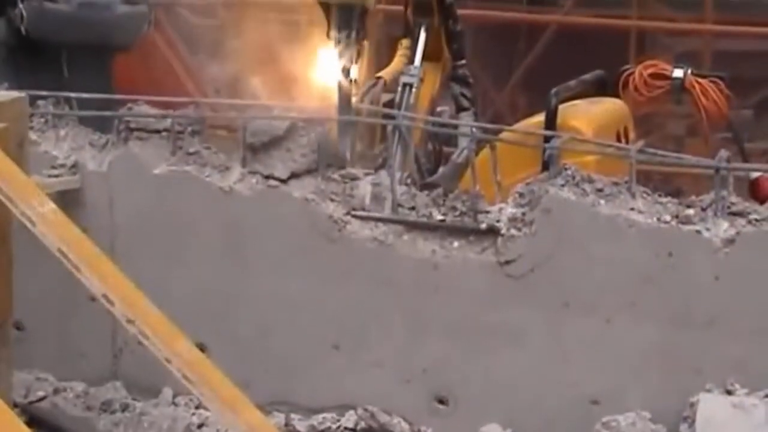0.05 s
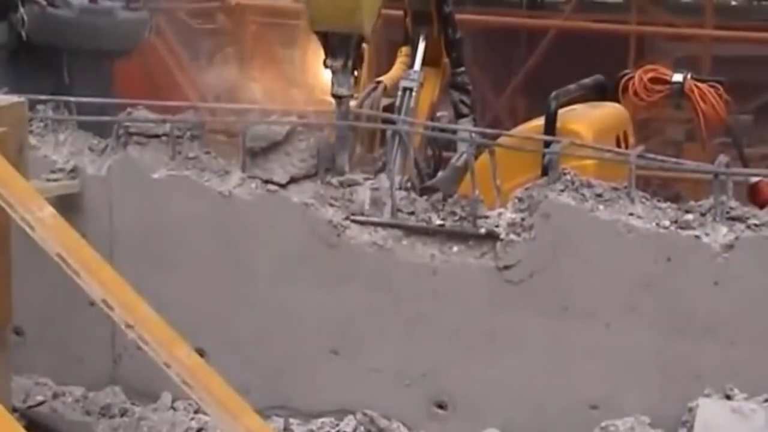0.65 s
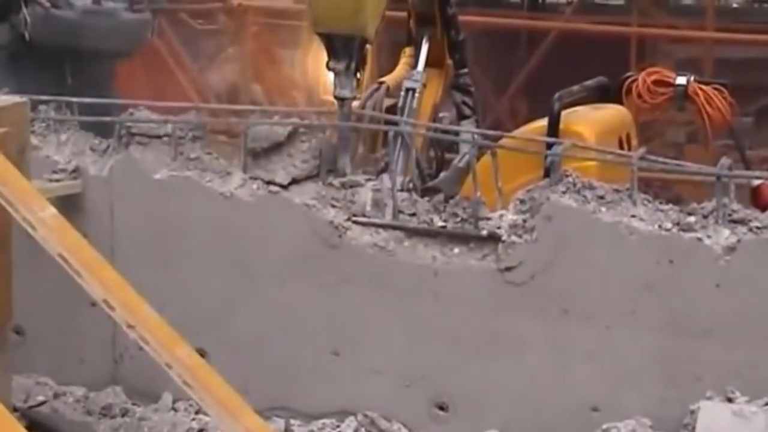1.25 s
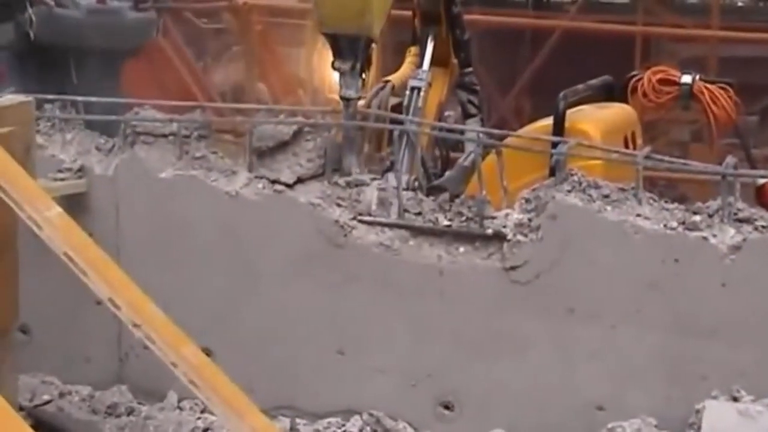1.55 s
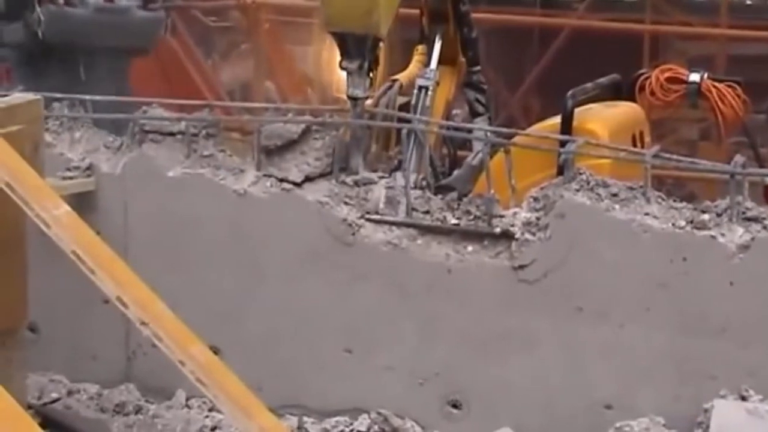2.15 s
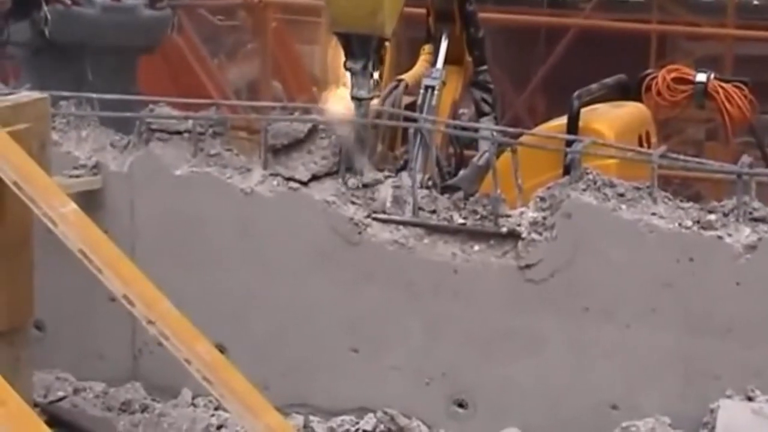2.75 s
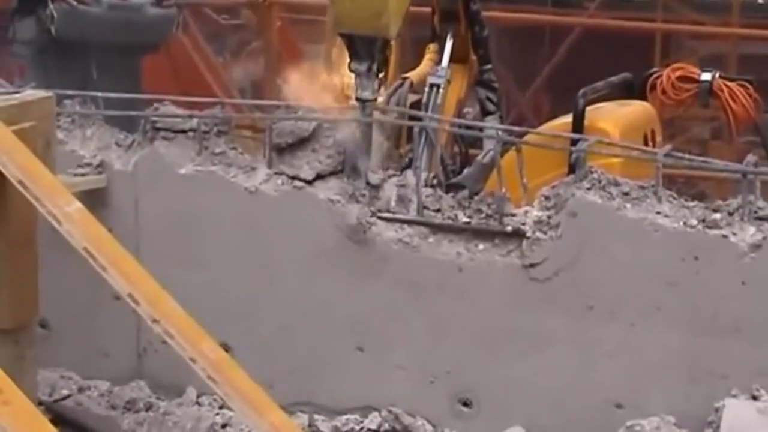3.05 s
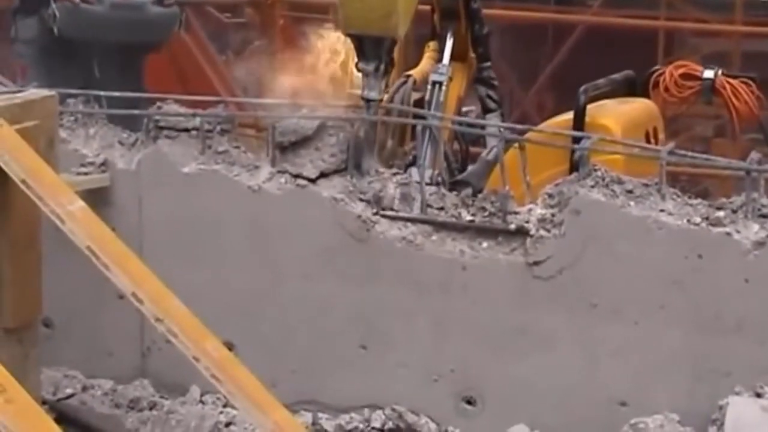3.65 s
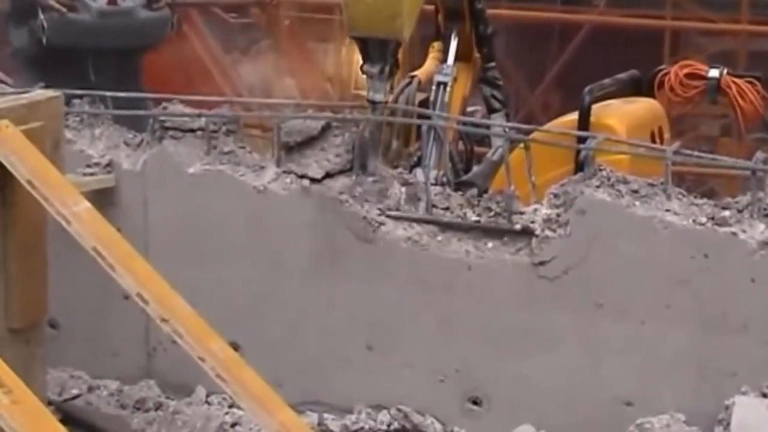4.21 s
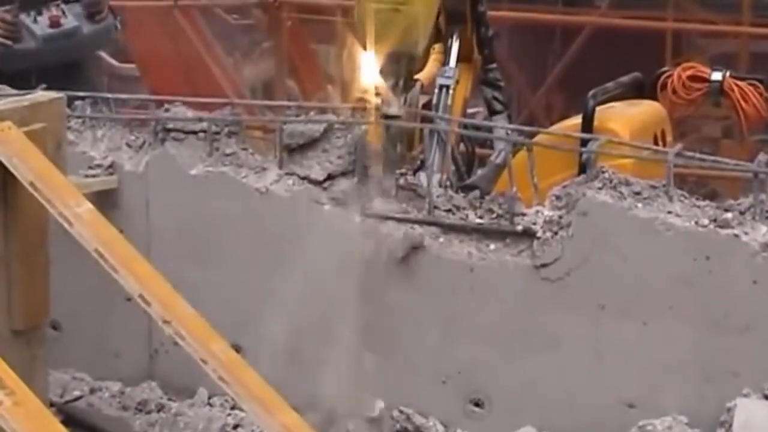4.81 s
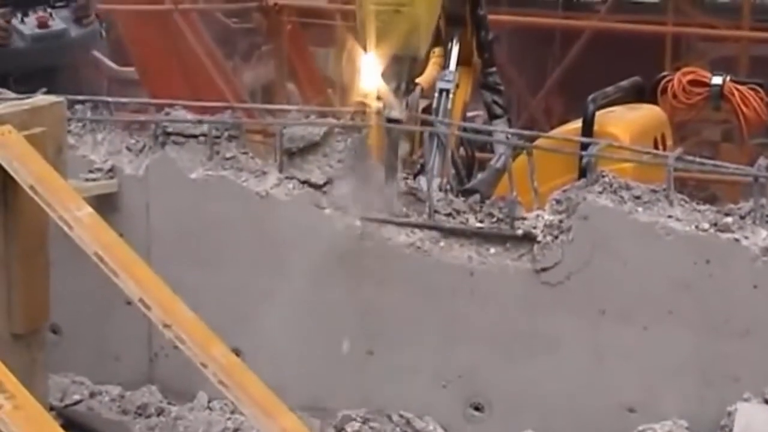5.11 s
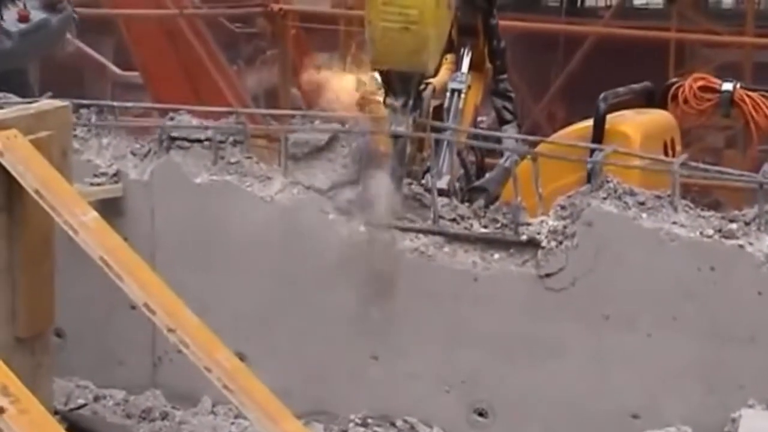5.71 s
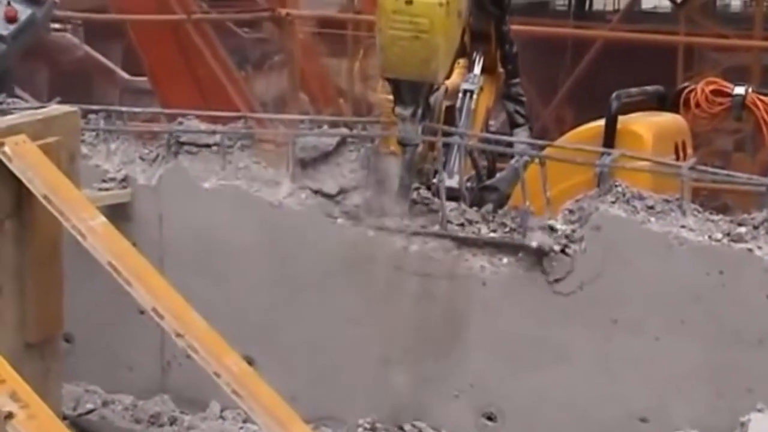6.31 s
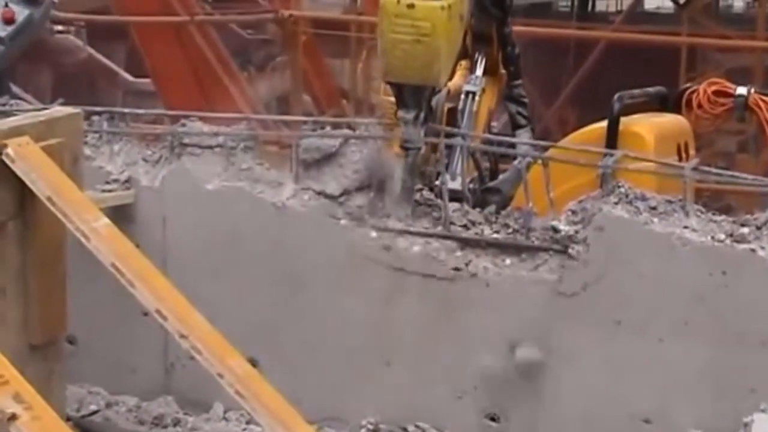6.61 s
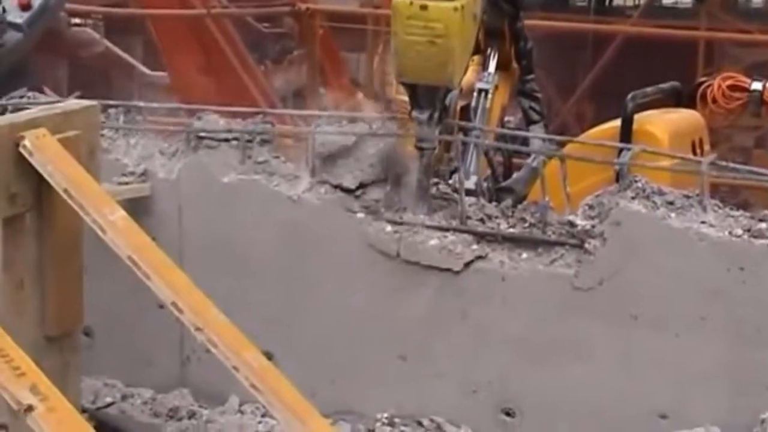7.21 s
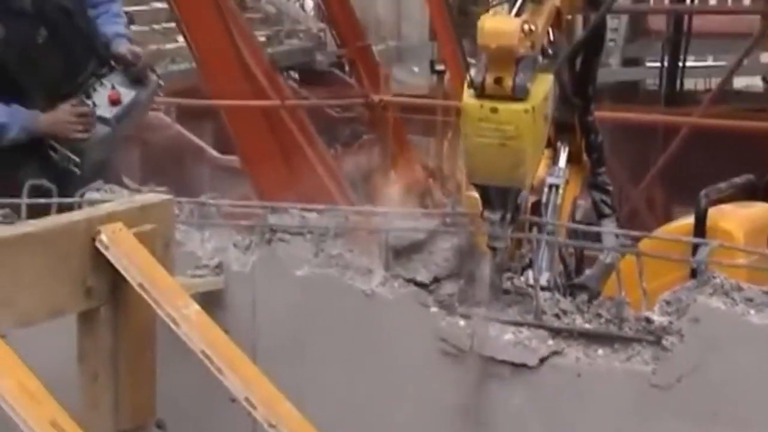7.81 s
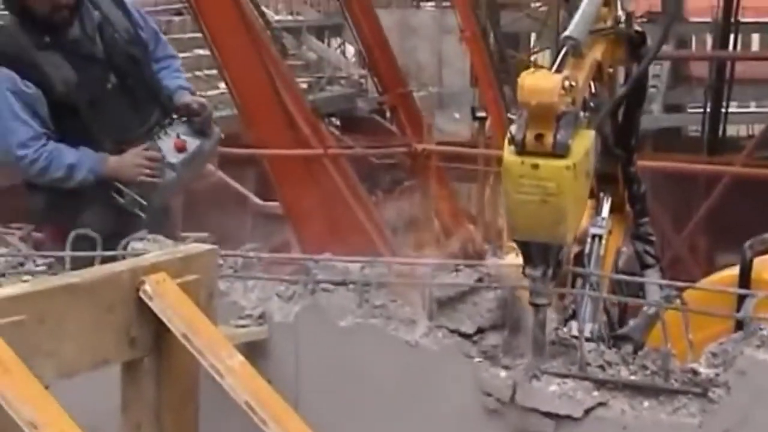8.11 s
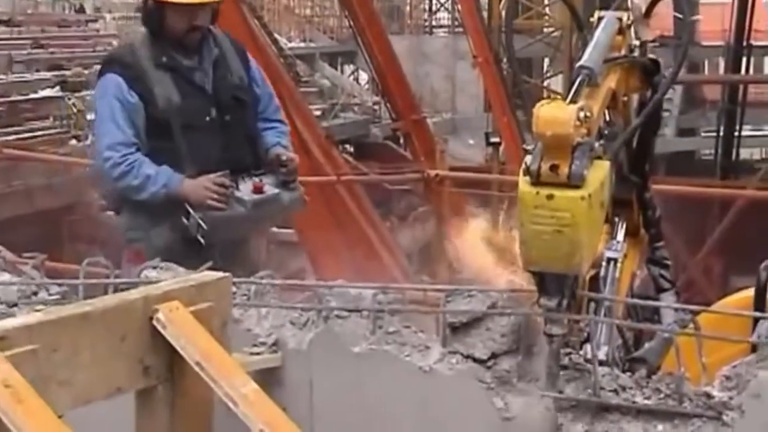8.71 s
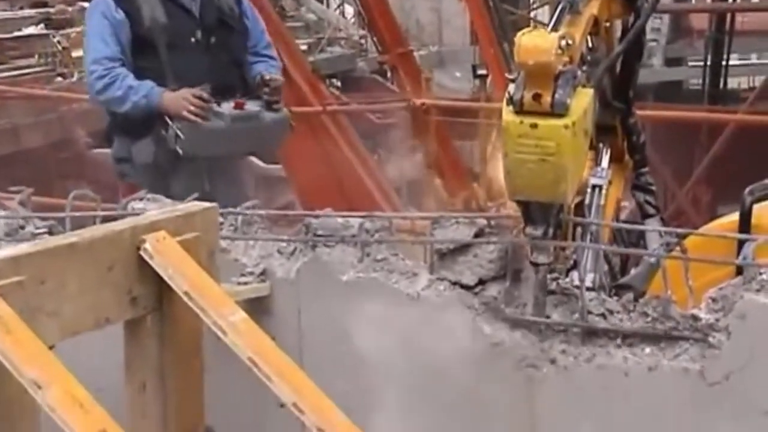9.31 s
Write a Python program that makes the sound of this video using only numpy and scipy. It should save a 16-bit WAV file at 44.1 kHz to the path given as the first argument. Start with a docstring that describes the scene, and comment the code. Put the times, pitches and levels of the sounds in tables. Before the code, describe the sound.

Fast, continuous jackhammering on concrete at a building site, with cracking impacts, a high metallic ring and a machine humming underneath.

```python
"""On a building site, a hydraulic breaker chisels down a concrete wall at up to 21 blows a second.
In each cycle the valve jolts the housing and the piston strikes the steel chisel. The impact gives a
broadband crack, excites the damped modes of chisel, housing and wall, and is reflected around the site.
When concrete breaks away, the chisel hangs loose, is less damped and rings longer; freed pieces rattle.
The hydraulic pump drones underneath, and a little grit falls before the first blow."""
import sys
import numpy as np
from scipy import signal
from scipy.fft import rfft, irfft, next_fast_len
from scipy.io import wavfile

SR = 44100
rng = np.random.default_rng(int(sys.argv[2]) if len(sys.argv) > 2 else 0)


def unload_audio(sound):
    """Save the sound as a 16-bit wav file, at the path given as the first command line argument."""
    columns = np.transpose(np.atleast_2d(sound))
    # keep every value between -1 and 1, then stretch to whole-number steps
    steps = np.round(np.clip(columns, -1, 1) * 32767)
    wavfile.write(sys.argv[1], SR, steps.astype(np.int16))


N = 421155
TIME = np.arange(N) / SR

# pump drone under load: time_s, level_db
PUMP_LEVEL = [(0, -47), (1.85, -34), (2.1, -40), (2.9, -42.5), (3.3, -35.5), (4.3, -37.5), (5.1, -41.5),
              (5.6, -37), (6.1, -51), (6.7, -40), (7, -34), (8.3, -34.5), (8.7, -37.5)]
# spectral shapes of pump, distant site, impact and reflections: frequency_hz, relative_density_db
PUMP_SPECTRUM = [(25, -18), (75, -32), (122, 8), (160, -0.5), (240, -8), (500, -41)]
SITE_SPECTRUM = [(25, -11), (140, 3.5), (400, -0.5), (900, -1.5), (3500, -17.5), (7000, -28),
                 (10500, -26.5), (12000, -47)]
CRACK_SPECTRUM = [(250, -18.5), (700, 1.5), (1500, 0), (2400, 0), (3400, -0.5), (5000, 0.5), (5800, 4.5),
                  (6600, 4.5), (7200, 5), (7700, -1), (9800, -1), (12000, -9.5), (15000, -38.5)]
ECHO_SPECTRUM = [(100, -5.5), (330, -0.5), (750, 7), (1500, -1.5), (3000, -6), (5300, -8), (6400, -2.5),
                 (7700, -7), (11500, -31), (13500, -51)]
# likeness of left and right in the diffuse sound: frequency_hz, correlation
COHERENCE = [(30, 0.64), (120, 0.94), (500, 0.87), (1200, 0.85), (6500, 0.85), (7500, 0.24), (9000, -0.11)]
# falling grit: start_s, level_db
GRIT_FALLS = [(.235, -34), (0.421, -32), (.49, -39)]
# hammering speed in the two long runs: time_s, blows_per_s
FIRST_RUN_RATE = [(.9082, 10.77), (1.32, 13.53), (1.58, 14.28), (1.92, 9.85), (2.02, 6.94), (2.37, 15.12),
                  (2.59, 17.76), (3.14, 20.96), (3.34, 16.73), (3.46, 13.6), (3.94, 14.87), (4.2, 19.22),
                  (4.48, 21.39)]
SECOND_RUN_RATE = [(5.4659, 19.56), (5.68, 19.74), (6.73, 21.05), (7.87, 21.37), (8.27, 19.56),
                   (8.42, 19.75), (8.58, 21.22), (9.13, 20.3), (9.55, 20.4)]
# blows as the breaker starts, and as it stumbles after a chunk falls away: start_s, strength_db
STRAY_BLOWS = [(0.6532, -19.5), (0.8036, -21.5), (4.522, -25), (4.5735, -19), (4.6408, -19.5),
               (4.6936, -18), (4.7522, -22), (4.8268, -21.5), (4.9071, -19.5), (4.9835, -19), (5.0392, -19),
               (5.0995, -21.5), (5.159, -22), (5.219, -26), (5.3085, -19), (5.3818, -20)]
# how firmly the chisel bears on the wall, relative to the usual: time_s, bearing_db
TIP_BEARING = [(.65, -0.5), (.95, 6.5), (1.5, 5), (1.85, 4), (1.95, -7), (2.18, 3.5), (2.4, -3.5),
               (3.3, -3), (3.7, 5), (4.3, 2.5), (4.8, -10), (5.25, -7), (5.6, -0.5), (6.2, 1), (7.15, -1),
               (7.75, 3.5), (8.33, -5.5), (8.5, 0), (9.1, -2.5), (9.5, 1.5)]
# spells of a loose chisel: start_s, end_s, looseness_fraction, overtone_lift_db, pitch_drop_hz
LOOSE_CHISEL = [(0.845, 1.9, 0.15, 6.5, -11), (2.75, 3.28, 0.9, 13.5, 22), (4.346, 5.576, 0.7, 10.5, 13.5),
                (7.03, 8.395, 0.18, 12.5, 1)]
# mode of the tip in its hole, shifting as it digs in: time_s, level_db, pitch_hz
CONTACT_MODE = [(.65, -14, 6190), (1.6, -5.5, 6500), (2, -18, 6260), (2.9, -8, 6570), (3.7, -11, 6300),
                (5.4, -7.5, 6595), (6.1, -15, 6550), (7.12, -8, 6580), (7.7, -34, 6320), (8.27, -3.5, 6460),
                (8.6, -12.5, 6350), (9.5, -10.5, 6510)]
# further modes of the chisel: pitch_hz, relative_level_db, decay_s
CHISEL_OVERTONES = [(4020, 11, 0.0066), (8380, -22, 0.061), (9360, 1.5, 0.021), (11190, 5, 0.02)]
# modes of the housing and of the wall's deep knock and higher clack: pitch_hz, width_hz, relative_level_db
HOUSING_RESONANCES = [(337.8, 11.9, -2), (410.5, 18, -4.5), (472, 200, -5)]
KNOCK_RESONANCES = [(693, 38, -0.5), (815, 136, 2), (1001, 25, -14.5)]
CLACK_RESONANCES = [(1210, 62, -4.5), (1424, 27, -7), (2070, 16, -28.5)]
# cracked slabs and bared steel bars: start_s, end_s, pitch_hz, width_hz, level_db
FREED_PIECES = [(.65, 1.95, 307, 110, -20), (.7, 1.9, 900, 110, -16), (2.1, 2.945, 329, 20, -28),
                (2.947, 4.55, 463, 36, -24.5), (3.35, 4.65, 2425, 24, -28), (5.75, 6.5, 795, 55, -12.5),
                (5.7, 6.95, 1308, 55, -16.5), (5.7, 6.9, 2020, 110, -14), (6.45, 7.953, 692, 39, -18),
                (7, 7.9, 395, 37, -24), (7.55, 8.852, 990, 72, -15.5), (8.95, 9.9, 1980, 140, -12)]

BLOW_DB, BLOW_SCATTER_DB = -19, 1   # strength at the usual bearing; spread from blow to blow
CHISEL_HZ, SEATED_DB, SEATED_DECAY_S = 6192, -17.5, 0.011   # main mode, before left-right balance
LOOSE_RISE_DB, LOOSE_EXTRA_S = 9.5, 0.025   # added to its level and decay when fully loose
CHOKE_S, QUIET_S = 0.015, 0.0013   # pressing home damps the chisel over this time, this long before a blow


def from_db(db):
    """Amplitude grows tenfold for every 20 dB."""
    return 10 ** (np.asarray(db) / 20)


def follow(rows, when):
    """Linear interpolation gives each column of a curve at the given times."""
    time_s, *columns = np.transpose(rows)
    return [np.interp(when, time_s, column) for column in columns]


def at_hz(points, hz):
    """A spectrum is interpolated on a logarithmic frequency axis."""
    known_hz, values = np.transpose(points)
    return np.interp(np.log(hz + 1), np.log(known_hz), values)


def colour(x, spectrum):
    """A minimum-phase filter shapes the spectrum causally; white noise keeps its power."""
    size = 2 ** 19
    gain = from_db(at_hz(spectrum, np.fft.rfftfreq(size, 1 / SR)))
    gain /= np.sqrt(np.mean(gain ** 2))
    cepstrum = irfft(np.log(gain))
    cepstrum[1:size // 2] *= 2
    cepstrum[size // 2 + 1:] = 0
    return irfft(rfft(x, size) * np.exp(rfft(cepstrum)))[..., :N]


def spread(pair):
    """Partial coherence: two unrelated signals mix into left and right, alike in bass, apart in treble."""
    size = next_fast_len(N + SR // 8)
    mid, side = rfft(pair, size)
    alike = at_hz(COHERENCE, np.fft.rfftfreq(size, 1 / SR))
    stereo = np.sqrt((1 + alike) / 2) * mid + np.sqrt((1 - alike) / 2) * side * [[1], [-1]]
    return irfft(stereo, size)[:, :N]


def place(sounds, times):
    """Superposition: two-channel sounds add, each from its own start time."""
    out = np.zeros((2, N + SR))
    for sound, start_s in zip(sounds, times):
        start = int(start_s * SR)
        out[:, start:start + sound.shape[-1]] += sound
    return out[:, :N]


def swell(age, rise_s, fall_s, bend):
    """A transient rises fast and decays as a stretched exponential, at first gently if bend is large."""
    return (1 - np.exp(-age / rise_s)) * np.exp(-(age / fall_s) ** bend)


def spell(when, start_s, end_s, ease_s):
    """A trapezoidal window rises from 0 to 1, holds, and is back at 0 by the end."""
    return np.clip(np.minimum(when - start_s, end_s - when) / ease_s, 0, 1)


def noise_bursts(envelope, levels_db, change):
    """A dense impulse response acts as noise; each impact renews the share `change` of its power."""
    response = rng.standard_normal((2, len(envelope)))
    for level_db, share in zip(levels_db, np.clip(change, 0, 1)):
        response = np.sqrt(1 - share) * response + np.sqrt(share) * rng.standard_normal(response.shape)
        yield from_db(level_db) * envelope * response


def impulses(when, levels_db):
    """A very brief force acts as an impulse, one for each blow."""
    out = np.zeros(N)
    out[np.minimum((when * SR).astype(int), N - 1)] = from_db(levels_db)
    return out


def resonate(x, hz, width_hz):
    """A damped oscillator answers a unit impulse with a decaying sine of height 1."""
    radius, angle = np.exp(-np.pi * width_hz / SR), 2 * np.pi * hz / SR
    return signal.lfilter([0, np.sin(angle)], [1, -2 * radius * np.cos(angle), radius ** 2], x + 1e-18)


def struck(modes, when, levels_db, scatter_db):
    """Modal response: a body answers a moment later in damped modes, excited unevenly from blow to blow."""
    out, delay_s = 0, 0.00211
    for k, (hz, width_hz, mode_db) in enumerate(modes):
        push_db = levels_db + mode_db + scatter_db * rng.standard_normal(len(when))
        out += (-1) ** k * resonate(impulses(when + delay_s, push_db), hz, width_hz)
    return out


def pump():
    """The loaded pump radiates low-frequency noise and a tone with slow frequency modulation."""
    drone_db, = follow(PUMP_LEVEL, TIME)
    knots = np.linspace(0, TIME[-1], num=120)
    pitch_hz = 126 + 4 * np.interp(TIME, knots, rng.standard_normal(len(knots)))
    tone = from_db(-8) * np.sin(2 * np.pi * np.cumsum(pitch_hz) / SR) * [[1], [0]]   # mid signal only
    rumble = from_db(-1.5) * colour(rng.standard_normal((2, N)), PUMP_SPECTRUM)
    return from_db(drone_db) * (tone + rumble)


def distant_site():
    """The far noise of the site is stationary, with most of its power at low frequencies."""
    return from_db(-36.5) * colour(rng.standard_normal((2, N)), SITE_SPECTRUM)


def grit():
    """Crumbs of concrete land in small impacts, heard as short bursts of band-limited noise."""
    envelope = swell(np.arange(SR // 8) / SR, rise_s=0.0033, fall_s=0.025, bend=1)
    when, levels_db = np.transpose(GRIT_FALLS)
    rustle = place(noise_bursts(envelope, levels_db, change=np.ones(len(when))), when)
    return signal.sosfilt(signal.butter(2, [1200, 6000], "band", fs=SR, output="sos"), rustle)


def blow_times(run):
    """Phase is the integral of rate: the piston lands at the start and after each whole cycle."""
    when = np.arange(run[0][0], run[-1][0], 1 / SR)
    rate, = follow(run, when)
    cycles = (np.cumsum(rate) - rate[0]) / SR
    return np.interp(np.arange(int(cycles[-1]) + 1), cycles, when)


def blows():
    """The excitation, as times and strengths: within a run, firmer bearing gives a harder impact."""
    run_s = np.concatenate([blow_times(FIRST_RUN_RATE), blow_times(SECOND_RUN_RATE)])
    bearing_db, = follow(TIP_BEARING, run_s)
    run_db = BLOW_DB + 0.42 * bearing_db + BLOW_SCATTER_DB * rng.standard_normal(len(run_s))
    return np.transpose(sorted([*zip(run_s, run_db), *STRAY_BLOWS]))


def looseness(when):
    """The boundary condition varies: looseness (0 seated, 1 free), with its overtone lift and pitch drop."""
    return sum(np.outer(values, spell(when, start_s, end_s, ease_s=0.16))
               for start_s, end_s, *values in LOOSE_CHISEL)


def valve(when, blow_db, loose):
    """Hydraulic shock: switching oil flow jolts the housing just before impact, less when unloaded."""
    lead_s = 0.00462
    jolts = impulses(when - lead_s, blow_db + 5 - 9 * loose ** 2)
    return resonate(jolts, hz=438, width_hz=190)


def crack(when, blow_db, loose):
    """A brief impact has a broad spectrum: steel on steel and crushing stone, drawn out by near surfaces."""
    envelope = swell(np.arange(SR // 16) / SR, rise_s=0.00069, fall_s=0.0091, bend=1.156)
    bursts = noise_bursts(envelope, blow_db + 9.5, change=0.44 + 0.5 * loose)
    # some blows snap brighter and some duller, at random
    brightness = 0.51 * rng.standard_normal(len(when))
    snaps = (burst + bright * np.diff(burst, prepend=0) for burst, bright in zip(bursts, brightness))
    return colour(place(snaps, when), CRACK_SPECTRUM)


def chisel_mode(when, hz, levels_db, decay_s, free_s, detune_hz, rough):
    """Free vibration, choked before the next blow; grip shifts its pitch and rattling modulates it."""
    knots = np.arange(0, 1 / 6, 1 / 300)
    rings = []
    for centre_hz, level_db, fall_s, until_s in np.broadcast(hz, levels_db, decay_s, free_s):
        age = np.arange(0, 3.5 * fall_s, 1 / SR)
        pitch_hz = centre_hz + detune_hz * rng.standard_normal()
        phase = 2 * np.pi * (pitch_hz * age + rng.random())
        rattle = rng.standard_normal((2, len(knots))) + 1j * rng.standard_normal((2, len(knots)))
        mid, side = (rough * np.interp(age, knots, row) for row in rattle)
        modulation = (1 + mid + 0.93 * side * [[1], [-1]]) / np.sqrt(1 + 2 * rough ** 2)
        tone = np.real(modulation * np.exp(1j * phase))
        envelope = swell(age, rise_s=0.00087, fall_s=fall_s, bend=1.26)
        choke = np.clip((until_s - age) / CHOKE_S, 0, 1)
        rings.append(from_db(level_db) * envelope * choke * tone)
    return place(rings, when)


def chisel(when, loose, lift_db, drop_hz):
    """A steel bar rings along its length; when loose it rings louder and longer and rebounds harder."""
    free_s = np.diff(when, append=np.inf) - QUIET_S
    main_hz = CHISEL_HZ - drop_hz
    main_db = SEATED_DB + LOOSE_RISE_DB * loose
    main_s = SEATED_DECAY_S + LOOSE_EXTRA_S * loose
    main = chisel_mode(when, main_hz, main_db, main_s, free_s, detune_hz=8, rough=0.2)
    tip_db, tip_hz = follow(CONTACT_MODE, when)
    tip = chisel_mode(when, tip_hz, tip_db, decay_s=0.011, free_s=free_s, detune_hz=36, rough=0.53)
    flight_s = rng.uniform(0.01, 0.038, len(when))
    rebound = chisel_mode(when + flight_s, main_hz, main_db - 19 + 14 * loose,
                          decay_s=0.028, free_s=free_s - flight_s, detune_hz=25, rough=0.3)
    overtones = sum(chisel_mode(when, hz, db + lift_db - 41.5, decay_s, free_s, detune_hz=10.4, rough=0.98)
                    for hz, db, decay_s in CHISEL_OVERTONES)
    balance = from_db([[-1.6], [1.2]])   # left, right
    return balance * (main + rebound) + tip + overtones


def echoes(when, blow_db, bearing_db, loose):
    """Reverberation: walls and steelwork all round reflect each blow as a dull tail."""
    envelope = swell(np.arange(SR // 3) / SR, rise_s=0.0049, fall_s=0.081, bend=0.45)
    tails = noise_bursts(envelope, blow_db - 9.5 + 0.078 * bearing_db, change=0.15 + 0.5 * loose ** 2)
    return colour(place(tails, when), ECHO_SPECTRUM)


def housing(when, blow_db):
    """Each impact excites the low natural modes of the breaker's housing."""
    return struck(HOUSING_RESONANCES, when, blow_db - 11, scatter_db=1.5)


def wall(when, bearing_db):
    """Mechanical coupling: the more firmly the chisel bears, the louder the concrete's modes sound."""
    knock = struck(KNOCK_RESONANCES, when, -19 + 0.89 * bearing_db, scatter_db=1.2)
    clack = struck(CLACK_RESONANCES, when, -20.5 + 0.78 * bearing_db, scatter_db=2)
    return knock + clack


def pieces(when):
    """Each freed piece resonates, struck slightly late by every blow, until it settles or breaks off."""
    out, least_lag_s = 0, 0.001486
    for start_s, end_s, *mode in FREED_PIECES:
        hit_s = when + least_lag_s * (1 + rng.random(len(when)))
        ringing = struck([mode], hit_s, levels_db=0, scatter_db=1.1)
        out += spell(TIME, start_s, end_s, ease_s=0.23) * ringing
    return out


def scene():
    """Sound pressures add: the diffuse noise, the knocking bodies and the ringing chisel."""
    when, blow_db = blows()
    bearing_db, = follow(TIP_BEARING, when)
    loose, lift_db, drop_hz = looseness(when)
    bodies = valve(when, blow_db, loose) + housing(when, blow_db) + wall(when, bearing_db) + pieces(when)
    # a gentle high-pass below 120 Hz thins the deep bass of these bodies
    knocks = signal.sosfilt(signal.butter(1, 120, "high", fs=SR, output="sos"), bodies)
    impacts = crack(when, blow_db, loose) + echoes(when, blow_db, bearing_db, loose)
    diffuse = spread(impacts + pump() + distant_site() + grit())
    return diffuse + knocks + chisel(when, loose, lift_db, drop_hz)


def record(dry):
    """Soft saturation rounds the highest peaks, and a low-pass filter removes the top of the treble."""
    ceiling, stopband_hz = 1.1, 16000
    rounded = ceiling * np.tanh(dry / ceiling)
    return signal.sosfilt(signal.cheby2(12, 70, stopband_hz, fs=SR, output="sos"), rounded)


dry = scene()
out = record(dry)
unload_audio(out)
```